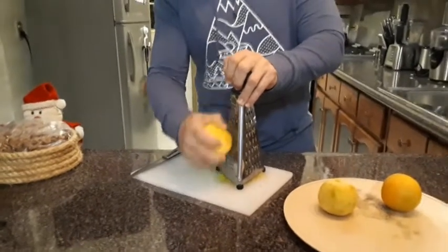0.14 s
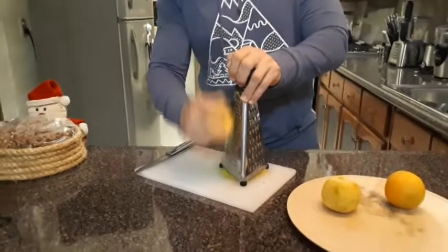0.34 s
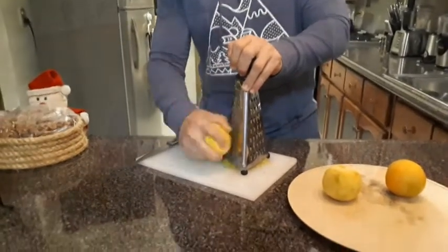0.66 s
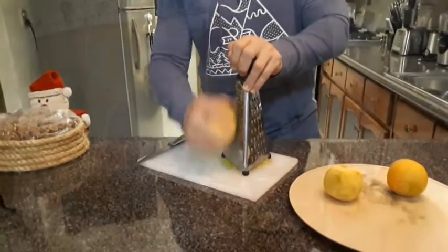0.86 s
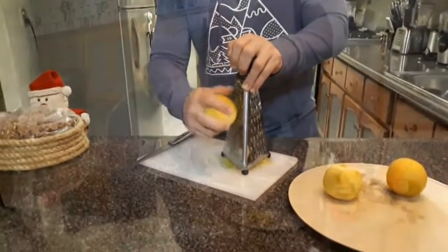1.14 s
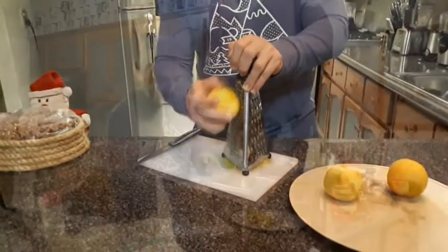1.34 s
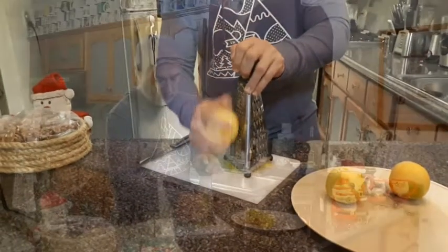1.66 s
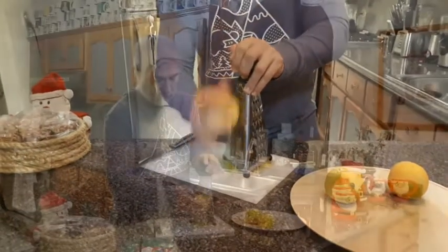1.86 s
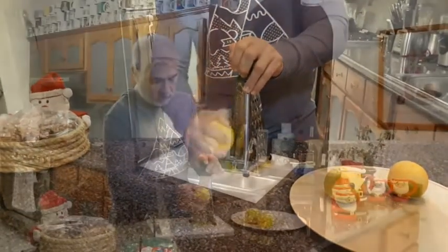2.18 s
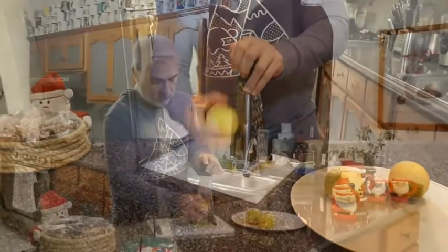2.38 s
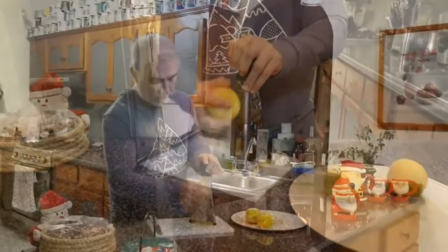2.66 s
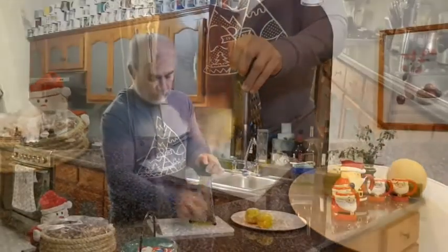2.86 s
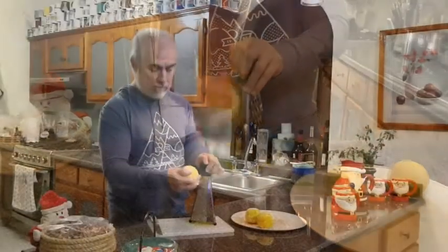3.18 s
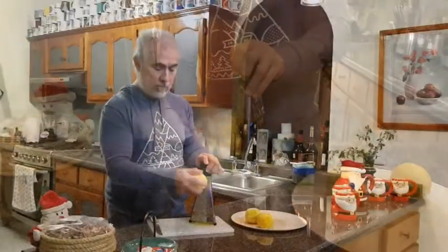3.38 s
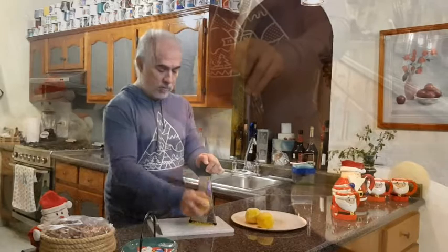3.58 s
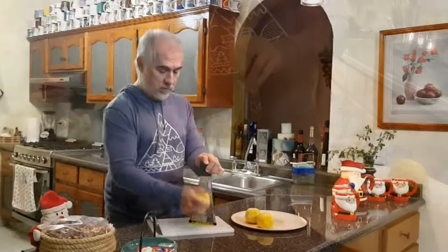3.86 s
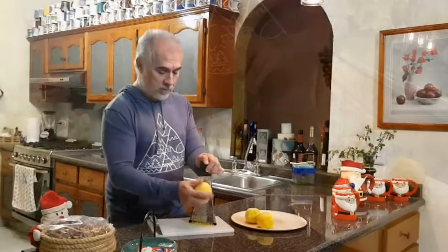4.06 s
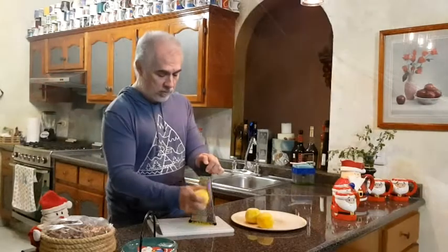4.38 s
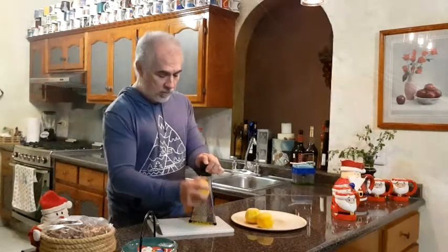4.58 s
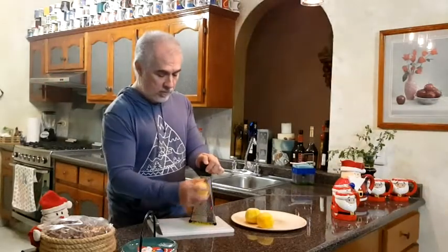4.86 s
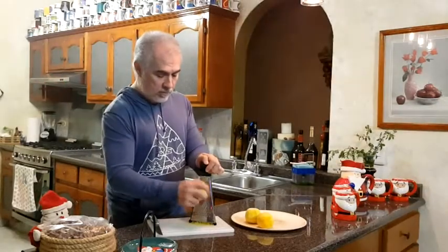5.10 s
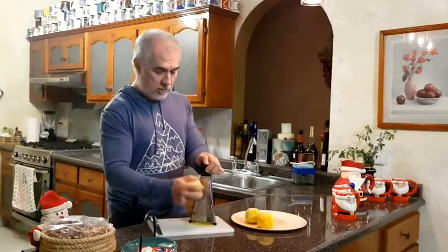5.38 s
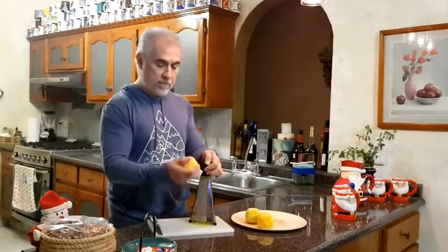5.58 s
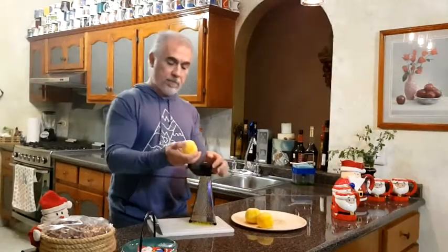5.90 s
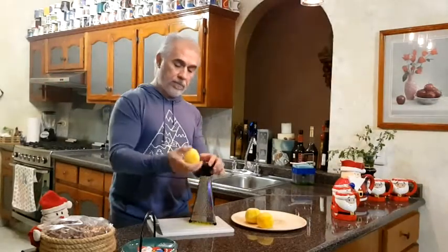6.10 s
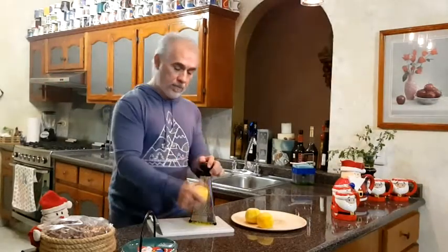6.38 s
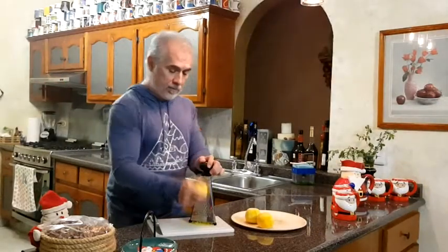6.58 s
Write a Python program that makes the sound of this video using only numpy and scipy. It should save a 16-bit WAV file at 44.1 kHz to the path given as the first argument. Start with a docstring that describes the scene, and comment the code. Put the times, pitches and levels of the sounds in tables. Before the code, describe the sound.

Fruit peel is rubbed in quick, regular rasping strokes over a metal box grater in a kitchen, pausing briefly before a short final burst.

```python
"""A lemon is rubbed quickly up and down a steel box grater that stands on a cutting board in a home kitchen.
The teeth tear the peel in dense tiny snaps that ring the sheet metal; down strokes are mostly hard, return
strokes light. A few knocks, catches on a tooth and brief squeals of the sheet metal stand out among them.
The grating is heard from two overlapping spots, beside the board and across the room, with echoes made of
decaying noise, over low rumble, the hum of a distant motor built from sines, and faint filtered hiss."""
import sys
import numpy as np
from scipy import signal
from scipy.fft import rfft, irfft, next_fast_len
from scipy.io import wavfile

SR = 44100
rng = np.random.default_rng(int(sys.argv[2]) if len(sys.argv) > 2 else 0)


def dump_mix(stems):
    """Bounce the given channels to the path in sys.argv[1] as a 16-bit WAV at rate SR."""
    frames = np.atleast_2d(stems).T  # one column per channel
    limited = np.clip(frames, -1, 1)  # hard clip at full scale
    pcm = np.round(limited * 32767).astype(np.int16)
    wavfile.write(sys.argv[1], SR, pcm)


N = 297234
STROKE_SIZE, ECHO_SIZE = 10240, 24576  # samples


def from_db(db):
    """Decibels to gain."""
    return 10 ** (np.asarray(db) / 20)


def rms_one(x):
    """Scale to unit power."""
    return x / np.sqrt(np.mean(x ** 2) + 1e-20)


def at_hz(points, hz):
    """Read a table on a log-frequency axis."""
    knots, values = np.transpose(points)
    return np.interp(np.log(np.maximum(hz, 1)), np.log(knots), values)


def bins(x):
    """Frequencies in Hz of the spectrum of x."""
    return np.fft.rfftfreq(x.shape[-1], 1 / SR)


def shaped(x, gain):
    """Filter a sound by a gain for each frequency."""
    return irfft(rfft(x) * gain, x.shape[-1])


def drift(rate, size):
    """Random curve of unit power, drawn as straight lines through `rate` new points a second."""
    steps = np.arange(size) * rate / SR
    return rms_one(np.interp(steps, np.arange(size), rng.standard_normal(size)))


def add(out, start_s, sound):
    """Lay a sound into the scene, trimming what falls outside it."""
    at = round(start_s * SR)
    first, last = max(at, 0), min(at + sound.shape[1], N)
    out[:, first:last] += sound[:, first - at:last - at]


# Likeness of left and right. Each row: frequency in Hz, correlation (1 is identical).
LIKENESS = [(100, 0.98), (250, .93), (480, 0.9), (950, 0.53), (1900, 0.17), (7500, 0.34), (15000, 0.064)]


def stereo(pair, colour, balance):
    """Two unrelated sounds become a coloured left and right, alike in the bass and apart in the treble."""
    hz = bins(pair)
    mid, side = rfft(pair) * from_db(at_hz(colour, hz))
    alike = np.clip(at_hz(LIKENESS, hz), -1, 1)
    ears = np.array([[1], [-1]])
    both = np.sqrt(1 + alike) * mid + np.sqrt(1 - alike) * side * ears
    return irfft(both * from_db(ears * at_hz(balance, hz) / 2), pair.shape[-1])


# Left-right balance of the far spot and the background. Each row: frequency in Hz, left minus right in dB.
FAR_BALANCE = [(200, 0.87), (4400, 0.76), (12000, 1.5)]
# Colour of the low rumble. Each row: frequency in Hz, relative level in dB per Hz.
RUMBLE_COLOUR = [(20, -41), (32, -16), (42, -9), (52, -8), (59, 3.5), (68, -7.5), (100, -16), (200, -23.5),
                 (330, -29), (600, -43), (1200, -65)]
# Fader ride of the rumble. Each row: time in seconds, level in dB.
RUMBLE_LEVEL = [(0, -59), (1.3, -47), (2.2, -43), (2.31, -30.5), (2.43, -36.5), (3.3, -40), (3.8, -32.5),
                (4.1, -40.5), (4.45, -34.5), (6.1, -38), (6.36, -29), (6.5, -34), (6.74, -27)]


def rumble():
    """Low room rumble: noise weighted to the bass, with a level that rises and falls."""
    level = from_db(np.interp(np.arange(N) / SR, *np.transpose(RUMBLE_LEVEL)))
    noise = rng.standard_normal((2, next_fast_len(N, True)))
    return level * rms_one(stereo(noise, RUMBLE_COLOUR, FAR_BALANCE))[:, :N]


MOTOR_HZ = 22.01  # average turning rate
# Harmonics of the motor. Each row: multiple of the turning rate, relative level in dB before wavering.
MOTOR_ORDERS = [(2, -9.5), (3, -6.5), (5, -13), (6, -1), (7, -2), (9, -17.5), (12, -24), (15, -23),
                (20, -25)]
# Fader ride of the hum. Each row: time in seconds, level in dB.
HUM_LEVEL = [(0, -40), (1.3, -62.5), (3.35, -46.5), (3.82, -36.5), (4.05, -53.5), (4.96, -33.5),
             (5.45, -40.5), (5.67, -32.5), (6.05, -42), (6.4, -36), (6.74, -33.5)]


def motor_hum(waver_db):
    """A distant motor hums at multiples of its slightly drifting speed, and each harmonic wavers by itself."""
    level = from_db(np.interp(np.arange(N) / SR, *np.transpose(HUM_LEVEL)))
    turns = np.cumsum(MOTOR_HZ * (1 + 0.003875 * drift(3.05, N))) / SR
    hum = 0
    for order, db in MOTOR_ORDERS:
        harmonic = np.sin(2 * np.pi * (round(order) * turns + rng.random()))
        hum = hum + from_db(db + waver_db * drift(4, N)) * harmonic
    return level * rms_one(hum)


# Colour of the hiss. Each row: frequency in Hz, relative level in dB per Hz.
HISS_COLOUR = [(300, -5), (900, 4), (2000, -1.5), (4000, -7.5), (7700, -23), (8600, -9), (12000, -1),
               (15500, -4.5)]
# Fader ride of the hiss, which rises until 4.1 s and then sinks a little.
# Each row: time in seconds, level in dB.
HISS_LEVEL = [(1.3, -67), (4.1, -59), (5.3, -63)]


def hiss():
    """Faint hiss: steady coloured noise under a slow fade."""
    level = from_db(np.interp(np.arange(N) / SR, *np.transpose(HISS_LEVEL)))
    noise = rng.standard_normal((2, next_fast_len(N, True)))
    return level * rms_one(stereo(noise, HISS_COLOUR, FAR_BALANCE))[:, :N]


# Kitchen reverberation. Each row: frequency in Hz, time to die by 60 dB in seconds.
KITCHEN_T60 = [(150, 1), (500, 0.66), (1400, 0.56), (5000, 0.43), (12000, 0.23)]


def reflections():
    """One stereo pattern of kitchen echoes: noise that dies sooner in the treble, octave by octave."""
    t = np.arange(ECHO_SIZE) / SR
    flat = [(100, 0)]
    noise = stereo(rng.standard_normal((2, ECHO_SIZE)), flat, flat) / np.sqrt(2)
    octave = np.clip(np.round(np.log2(np.maximum(bins(noise), 1) / 125)), 0, 7)
    tail = 0
    for k in np.unique(octave):
        # the echoes start 3 ms after the direct sound
        decay = from_db(-60 * t / at_hz(KITCHEN_T60, 125 * 2 ** k)) * (t > .003)
        tail = tail + shaped(noise, octave == k) * decay / np.linalg.norm(decay)
    return tail


# Broad colour of the scrape at each spot. Each row: frequency in Hz, relative level in dB per Hz.
NEAR_COLOUR = [(100, 1), (190, 2), (330, 1), (450, -9), (750, -4.5), (1100, -6.5), (1600, -4), (2600, -9),
               (4300, -11), (5400, -18), (7000, -19), (9000, -24.5), (11500, -19), (15500, -18.5)]
FAR_COLOUR = [(100, 4), (190, 1), (330, -3), (450, -8), (750, -3), (1100, -3), (1600, -4), (2600, -2),
              (4300, -10), (5400, -11.5), (7000, -12), (9000, -16), (11500, -15), (15500, -20.5)]
# Left-right balance of the near spot. Each row: frequency in Hz, left minus right in dB.
NEAR_BALANCE = [(200, -2), (700, -1.5), (1500, -0.5), (4400, 0.5), (6300, 7.5), (7800, 10.5), (9000, -9.5),
                (11200, 7), (14000, 13)]
# The two listening spots, near then far. Each row: colour, balance, share of power from the room,
# trims in dB of board rumble, rasp and sizzle.
SPOTS = [(NEAR_COLOUR, NEAR_BALANCE, 0.3, (-2.5, -0.66, -5)),
         (FAR_COLOUR, FAR_BALANCE, 0.38, (-3.0, -1.02, -4.5))]


def kitchen(sound, spot, patterns):
    """Direct sound plus echoes; the moving arm changes their pattern from sound to sound."""
    wet = np.clip(SPOTS[spot][2], 0, 1)
    echoes = patterns[rng.integers(len(patterns))]
    out = np.sqrt(wet) * signal.fftconvolve(sound, echoes, axes=1)
    out[:, :sound.shape[1]] += np.sqrt(1 - wet) * sound
    return out


def catch(peak_db, hz, width, fade_s):
    """A knock or a catch is a noise burst of a few milliseconds in one broad resonance."""
    t = np.arange(SR // 20) / SR
    strike = rng.standard_normal((2, len(t))) * np.exp(-t / fade_s)
    burst = signal.lfilter(*signal.iirpeak(hz, hz / width, fs=SR), strike)
    burst = burst + burst.mean(axis=0)  # draws left and right together
    return from_db(peak_db) * burst / abs(burst).max()


# The fruit knocks or catches on a tooth. Each row: start in seconds, dry peak in dB, centre in Hz, width in Hz,
# fade time constant of the strike in seconds, spot (0 near, 1 far).
CATCHES = [(0.275, -41, 330, 400, 0.0059, 0), (0.3957, -22, 600, 1400, 0.0019, 0),
           (2.05, -28, 2000, 4000, .003, 0), (6.299, -32, 3940, 5000, 0.0044, 1),
           (6.367, -34, 2500, 4000, .005, 1), (6.385, -16, 5440, 1400, 0.0045, 1),
           (6.605, -21, 2000, 3000, 0.0042, 1)]


def catches(out, patterns):
    """Lay every knock and catch into the room."""
    for start, peak_db, hz, width, fade_s, spot in CATCHES:
        add(out, start, kitchen(catch(peak_db, hz, width, fade_s), spot, patterns))


def pressure(rise, fall):
    """The hand's push swells and eases off, over times in seconds."""
    t = np.arange(STROKE_SIZE) / SR
    return np.sin(np.interp(t, [0, rise, rise + fall], [0, np.pi / 2, np.pi]))


def squeal(length_s, level_db, hz, wobble):
    """A short tone of the sheet metal whose pitch trembles while it swells and fades."""
    turns = np.cumsum(hz * (1 + wobble * drift(410, STROKE_SIZE))) / SR
    tone = np.sqrt(2) * np.sin(2 * np.pi * turns + rng.random((2, 1)))
    return from_db(level_db) * pressure(length_s / 2, length_s / 2) ** 2 * tone


# The peel sticks and slips in step with the sheet, which sings briefly. Each row: middle in seconds,
# length in seconds, dry level in dB at the top of the swell, average pitch in Hz, spot (0 near, 1 far).
SQUEALS = [(0.532, .03, -29, 1633, 0), (0.597, .02, -29.5, 1350, 0), (0.644, 0.022, -37, 1350, 0),
           (0.83, 0.031, -35, 1335, 0), (1.871, .05, -34.5, 1350, 0), (2.113, 0.051, -34.5, 1340, 0),
           (6.393, 0.023, -30.5, 1455, 1), (6.404, 0.063, -31.5, 1313, 1)]


def squeals(out, patterns):
    """Lay every stick-slip squeal into the room, centred on its middle."""
    for middle, length_s, level_db, hz, spot in SQUEALS:
        sound = squeal(length_s, level_db, hz, wobble=0.034)
        add(out, middle - length_s / 2, kitchen(sound, spot, patterns))


def teeth(snaps_per_s, spread_db, rows_per_s, chatter_db):
    """Tiny uneven snaps, bunched as the peel crosses the rows of teeth; two faces of the grater radiate them."""
    rows = np.cumsum(rows_per_s * from_db(2 * drift(25.4, STROKE_SIZE))) / SR
    bunching = from_db(chatter_db * np.cos(2 * np.pi * rows))
    sizes = from_db(spread_db * np.minimum(rng.exponential(1, STROKE_SIZE), 3))
    snaps = rng.random(STROKE_SIZE) < snaps_per_s / SR
    return snaps * sizes * bunching * rng.choice([-1, 1], (2, STROKE_SIZE))


def resonate(x, hz, width, lift_db):
    """Lift a narrow band so that it rings on, or cut it where the lift is negative."""
    a = from_db(lift_db / 2)
    damping = np.pi * width / SR
    c = -2 * np.cos(2 * np.pi * hz / SR)
    top = [1 + damping * a, c, 1 - damping * a]
    bottom = [1 + damping / a, c, 1 - damping / a]
    return signal.lfilter(top, bottom, x + 1e-18)


def bite(push, fullness, lumps_db, lumps_per_s):
    """The bite starts softly and then steepens as the push grows, and the knobbly peel makes it uneven."""
    return np.maximum(push, 0) ** fullness * from_db(lumps_db * drift(lumps_per_s, STROKE_SIZE))


BOARD_LOWEST_HZ, RASP_BOTTOM_HZ, RASP_TOP_HZ = 75, 573, 4480
GRIP_DETUNE = .014  # largest upward share by which the grip shifts a resonance
# Resonances of grater and board. Each row: nominal frequency in Hz, width in Hz,
# nominal lift in dB at the near spot, nominal lift in dB at the far spot.
MODES_OF_GRATER = [(314.3, 19, 3, 7.5), (412.4, 16, -15.5, 9), (525, 24, -4, 9.5), (572, 69, 3.5, -6),
                   (616, 43, 4.5, 3), (890, 140, 6, 3), (1260, 17, -2, 8), (1335, 70, 10, 6),
                   (1493, 32, -7, 7.5), (1580, 26, -1, -5.5), (1613, 110, 6, 7.5), (1872, 190, 4, 2.5),
                   (2274, 110, 7.5, -1), (2936, 190, -1.5, 4), (3660, 240, 4.5, 2), (4045, 170, 7, 1.5),
                   (4350, 120, 0.5, 5.5), (7870, 1500, 7.5, -4.5)]


def grating(push, rasp_db, sizzle_db, board_db, spot, grip_spread):
    """One stroke: the snaps shake board, sheet and teeth, and the grater's resonances ring."""
    colour, balance, _, trim_db = SPOTS[spot]
    snaps = teeth(snaps_per_s=11000, spread_db=1.5, rows_per_s=130, chatter_db=2.0)
    scrape = stereo(snaps, colour, balance)
    # the small board radiates no deep bass
    scrape = shaped(scrape, bins(scrape) > BOARD_LOWEST_HZ)
    # three bands: board rumble, rasp, sizzle
    band = np.digitize(bins(scrape), [RASP_BOTTOM_HZ, RASP_TOP_HZ])
    gains = from_db(rasp_db + np.array([board_db, 0, sizzle_db]) + trim_db)
    out = sum(gain * rms_one(shaped(scrape, band == k)) for k, gain in enumerate(gains))
    for hz, width, *lift_db in MODES_OF_GRATER:
        # hand and fruit damp and detune each resonance differently on every pass
        damping, detune = rng.uniform(-1.17, 1, 2)
        lift = lift_db[spot] * (1 + grip_spread * damping)
        out = resonate(out, hz * (1 + GRIP_DETUNE * detune), width, lift)
    # the holding hand stops the ring as soon as the stroke ends
    return out * bite(push, fullness=1.165, lumps_db=1.33, lumps_per_s=90.0)


FIRM_STROKE_DB = -30.5
BOARD_KEEPS = 0.2  # as a stroke gets lighter than a firm one, the board's rumble keeps this share of the lost dB
# Part of a stroke in which the push builds up, as a share of its length: near spot, far spot.
SWELL_SHARES = (0.47, 0.5)


def stroke(length_s, rasp_db, sizzle_db, spot):
    """Passes at one spot share a swell shape; the lighter one is, the more the board stands out under the rasp."""
    rise = length_s * np.clip(SWELL_SHARES[spot], .1, .9)
    board_db = BOARD_KEEPS * (FIRM_STROKE_DB - rasp_db)
    return grating(pressure(rise, length_s - rise), rasp_db, sizzle_db, board_db, spot, grip_spread=0.67)


# Light strokes back up the grater. Each row: start in seconds,
# rasp level in dB before trim, swell and ringing, spot (0 near, 1 far).
RETURN_STROKES = [(-.085, -40.5, 0), (.14, -44.5, 0), (.377, -38.5, 0), (.618, -40, 0), (.884, -37, 0),
                  (1.085, -55.5, 0), (1.493, -37.5, 0), (1.657, -40.5, 0), (1.919, -41, 0),
                  (2.358, -34.5, 1), (2.598, -34, 0), (2.777, -39.5, 1), (3.028, -40, 0), (3.572, -34, 1),
                  (3.785, -45, 1), (4.419, -35.5, 1), (4.754, -42, 0), (4.994, -38, 1), (6.472, -32.5, 1),
                  (6.685, -46, 1)]


def return_strokes(out, patterns):
    """Going back, the teeth slide more than they cut: less sizzle, and every stroke of one length."""
    for start, rasp_db, spot in RETURN_STROKES:
        sound = stroke(0.1, rasp_db, sizzle_db=-1.5, spot=spot)
        add(out, start, kitchen(sound, spot, patterns))


# Strokes down the grater, mostly hard, with a few light touches. Each row: start in seconds, length in seconds,
# rasp level in dB before trim, swell and ringing, extra sizzle in dB, spot (0 near, 1 far).
DOWN_STROKES = [(.016, 0.083, -33, 0, 0), (.25, 0.11, -31, 1, 0), (.502, 0.11, -30.5, 1, 0),
                (.763, 0.096, -30, 0, 0), (1.011, 0.061, -46, 0, 0), (1.334, 0.12, -40.5, -1.5, 1),
                (1.55, 0.11, -33.5, -1, 0), (1.776, 0.12, -29, 0, 0), (2.035, 0.099, -30.5, 1, 0),
                (2.26, 0.11, -34, -0.5, 1), (2.464, 0.12, -28.5, -0.5, 1), (2.677, 0.11, -25, 0, 1),
                (2.903, .11, -31.5, 0, 0), (3.134, 0.12, -31, 0, 0), (3.451, 0.12, -35.5, 1, 1),
                (3.675, 0.11, -28, -0.5, 1), (3.9, 0.11, -34.5, 0, 0), (4.296, 0.13, -33.5, 0, 1),
                (4.524, .122, -29, 0, 1), (4.882, 0.11, -29, -1.5, 1), (5.1, .121, -32, 2.5, 1),
                (6.3, 0.071, -49, 2, 1), (6.351, 0.11, -31, 4, 1), (6.578, 0.11, -29, 0.5, 1)]


def down_strokes(out, patterns):
    """The teeth cut into the peel on the way down, with length and sizzle set stroke by stroke."""
    for start, length_s, rasp_db, sizzle_db, spot in DOWN_STROKES:
        add(out, start, kitchen(stroke(length_s, rasp_db, sizzle_db, spot), spot, patterns))


def scene():
    """Background first, then the grating; near sounds are drier, far ones carry more of the room."""
    out = rumble() + motor_hum(waver_db=5.5) + hiss()
    patterns = [reflections() for _ in range(12)]
    catches(out, patterns)
    squeals(out, patterns)
    return_strokes(out, patterns)
    down_strokes(out, patterns)
    return out


def record(dry):
    """The top is cut steeply above 15950 Hz."""
    return signal.sosfilt(signal.ellip(12, .1, 90, 15950, fs=SR, output="sos"), dry)


dry = scene()
out = record(dry)
dump_mix(out)
```